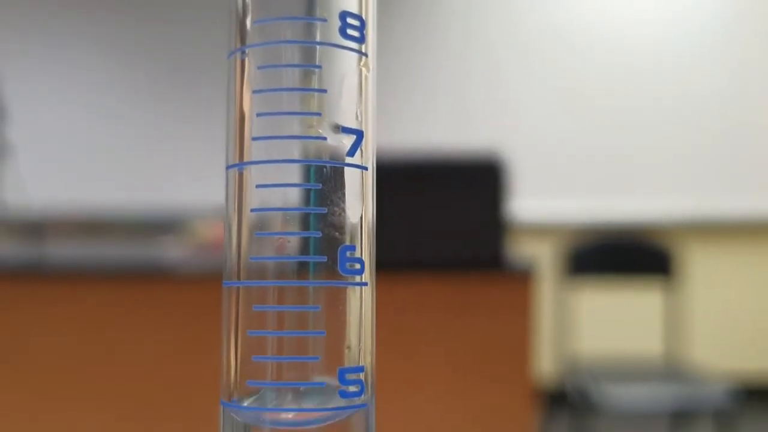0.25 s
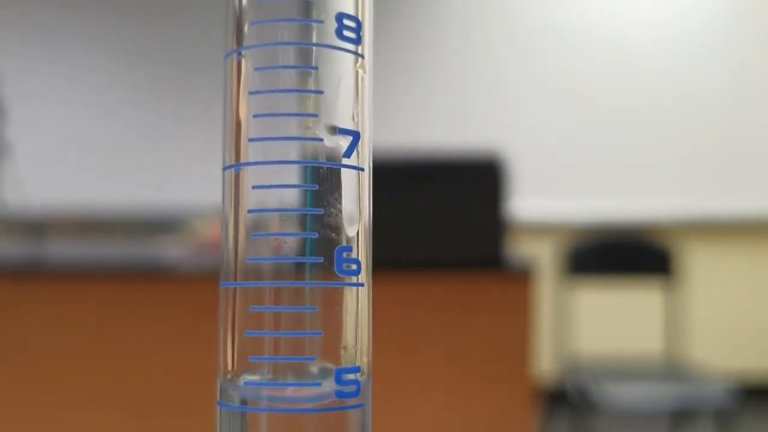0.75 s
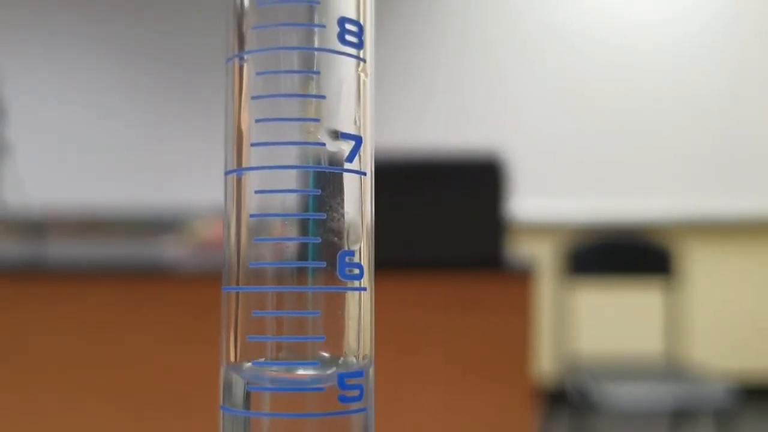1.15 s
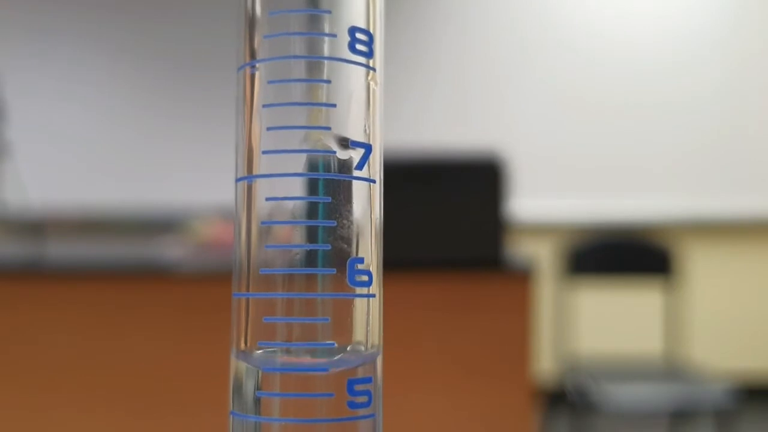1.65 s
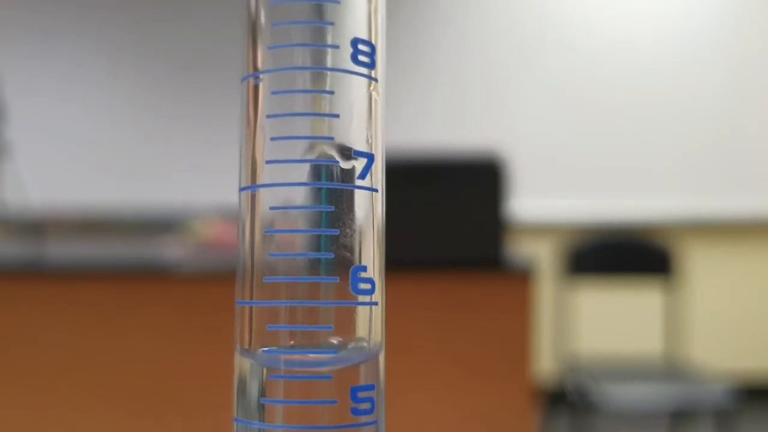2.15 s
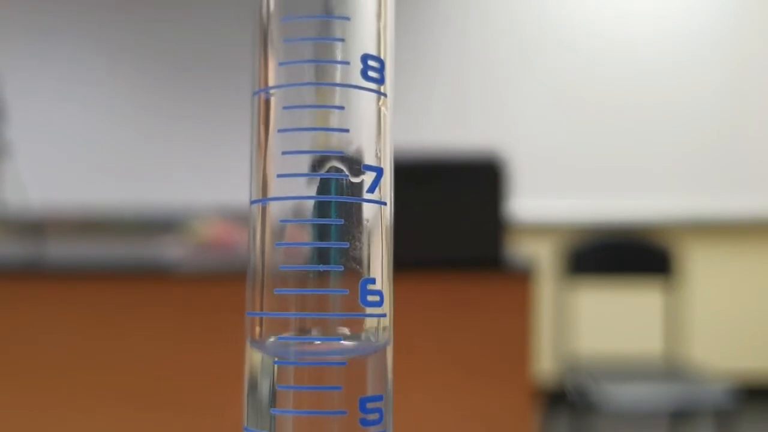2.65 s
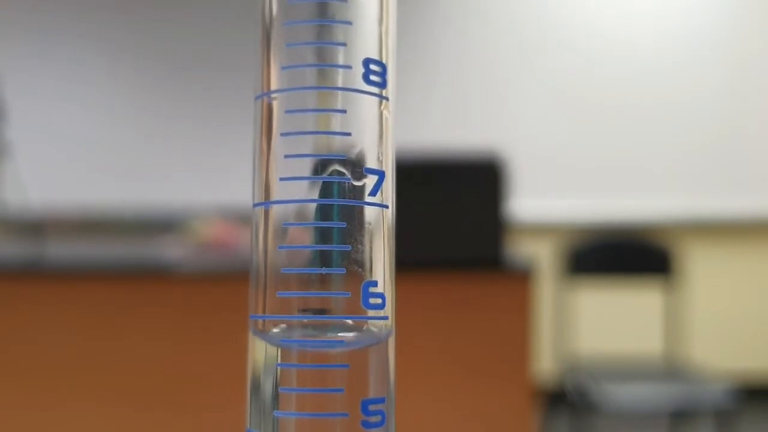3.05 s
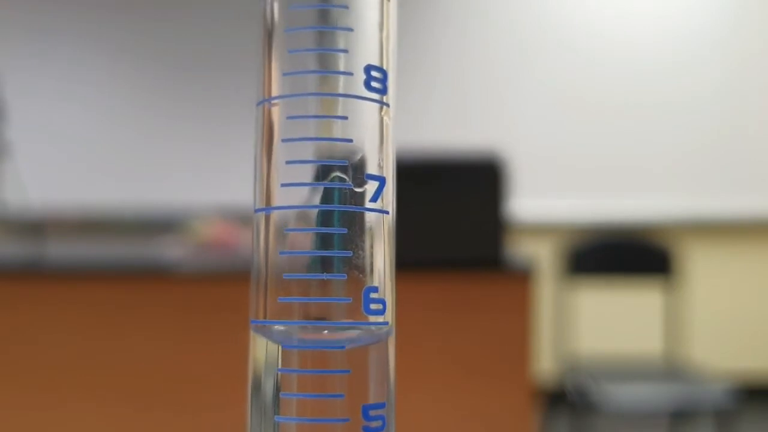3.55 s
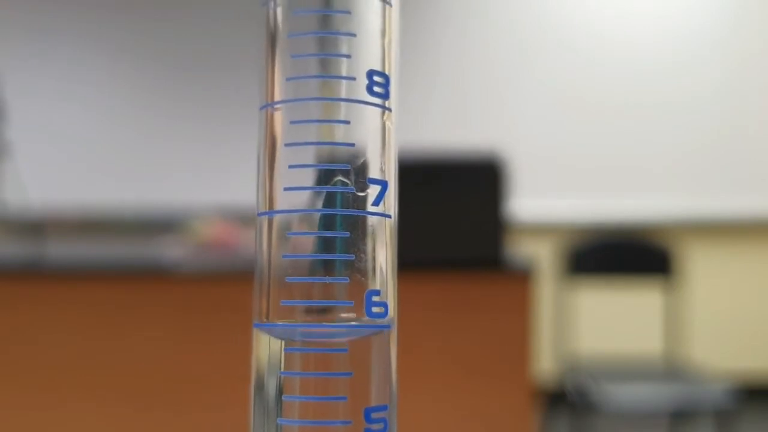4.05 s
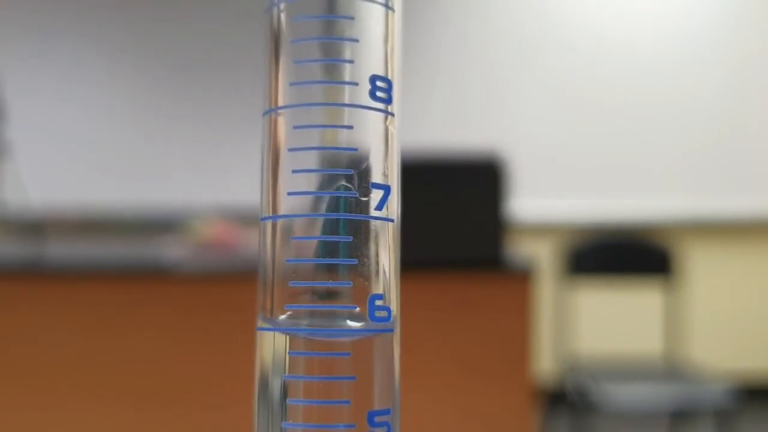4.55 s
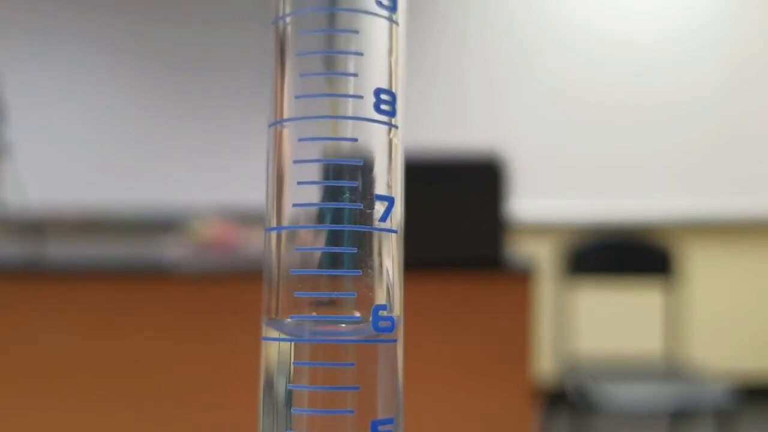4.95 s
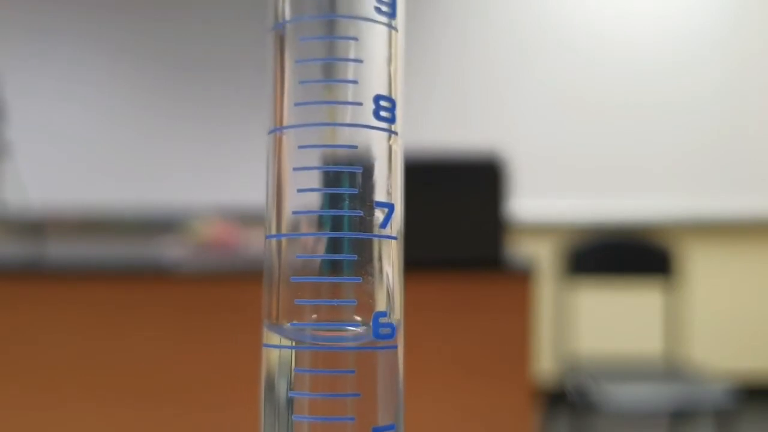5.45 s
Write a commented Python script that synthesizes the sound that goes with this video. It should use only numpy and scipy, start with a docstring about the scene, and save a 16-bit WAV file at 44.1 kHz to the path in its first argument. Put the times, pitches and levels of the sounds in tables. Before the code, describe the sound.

Deep fan drone pulses and beats unevenly in a still room, a faint distant wash swells and fades, then handling ticks cluster close up.

```python
"""Ventilation in a quiet classroom: a fan's drone throbs and beats in the duct, over rumbling air.
The air is shaped noise that also excites the low modes of the room; thin motor tones are wavering sines.
A distant wash, like a far car behind the windows, is noise that swells and fades; faint rustles across
the room are short hisses. The microphones are the two ports of a hand-held phone, which adds hiss and
sizzle; close to them, late in the take, its case ticks, thumps and rings as it slips in the grip."""
import sys
import numpy as np
from scipy import signal
from scipy.fft import rfft, irfft
from scipy.io import wavfile
from scipy.ndimage import uniform_filter1d

SR = 44100
rng = np.random.default_rng(int(sys.argv[2]) if len(sys.argv) > 2 else 0)


def put_to_file(sound):
    """Save the sound as 16-bit audio at rate SR, in the file named by the first command-line argument."""
    columns = np.atleast_2d(sound).T  # one column per channel
    safe = np.clip(columns, -1, 1)
    whole_steps = np.round(safe * 32767)
    wavfile.write(sys.argv[1], SR, whole_steps.astype(np.int16))


N = 251750
TIME = np.arange(N) / SR  # s
FREQ = np.maximum(np.arange(N // 2 + 1) * SR / N, 1)  # Hz, kept above zero for logs and ratios

# spectrum of the distant wash at full swell: pitch_hz, density_db (dB per Hz)
WASH_SPECTRUM = [(300, -100), (600, -86.5), (830, -86), (1020, -86), (1200, -99.5), (1550, -103),
                 (2000, -114), (3000, -128)]
# rise and fall of the wash: time_s, relative_level_db
WASH_SWELL = [(0, -15), (.6, -11), (1.2, -5), (1.8, -1.5), (2.6, 0), (3.1, -3.5), (3.8, -5.5), (4.5, -2.5),
              (5.2, -10), (5.7, -4.5)]

# faint rustles and ticks across the room: start_s, level_db (before the fade), centre_hz, width_hz
RUSTLE_EVENTS = [(.645, -84, 4800, 900), (3.3, -77.5, 2086, 280.4), (4.317, -81.5, 6500, 3800)]
RUSTLE_ATTACK_S, RUSTLE_T60_S, RUSTLE_PAN_DB = .008, 1, 4.5

# motor and mains tones: pitch_hz, level_db (rms), left_minus_right_db
MOTOR_TONES = [(289.1, -57.5, 4), (296.1, -58, 0), (502.3, -58.5, -4.5), (557, -74.5, 9.5),
               (605, -67.5, 15), (652, -77.5, 11.5), (837, -75.5, 3)]

# slips of the case in the grip: start_s, thump_db, ring_db, tick_hz, tick_db
CASE_SLIPS = [(5.084, -48, -70, 6000, -69), (5.103, -44, -82, 4500, -84), (5.281, -60, -77, 3200, -78),
              (5.443, -49, -70, 9400, -69), (5.465, -46, -67, 4300, -80), (5.525, -56, -82, 6000, -75),
              (5.602, -45, -71, 7800, -72), (5.634, -37, -43, 7900, -64), (5.656, -35, -66, 9500, -72),
              (5.669, -39, -73, 9000, -80), (5.686, -45, -56, 2600, -60)]
# resonances of the case, lowest first: pitch_hz, relative_level_db, t60_s, left_minus_right_db
CASE_RESONANCES = [(755, -3, .1, 6), (1150, -12, .02, 4), (1480, -15, .025, 4), (2490, -7, .05, 5),
                   (2720, -13, .025, 6), (3600, -19, .015, 8), (4240, -6, .055, 15), (4600, -22, .03, 12),
                   (5950, -23, .025, 10), (7820, -14, .035, 22), (8450, -25, .03, 10), (9500, -22, .025, 7)]
TICK_T60_S, TICK_WIDTH_HZ = .025, 600

# moving air: pitch_hz, density_db (dB per Hz)
AIR_SPECTRUM = [(15, -91.5), (30, -84.5), (46, -67.5), (100, -59.5), (150, -72.5), (230, -71.5),
                (380, -78.5), (520, -83.5), (700, -89.5), (1050, -99.5), (1400, -108), (2000, -115),
                (4200, -120), (6000, -134)]
# room and duct resonances that the air excites: pitch_hz, width_hz, density_db (dB per Hz)
ROOM_RESONANCES = [(47.3, 7.9, -63), (71.4, 23, -58.5), (90, 9.7, -54), (109.7, 17, -54.5),
                   (170.7, 22, -60.5), (195.4, 22, -66), (260.2, 16, -64.5), (294.2, 28, -63.5),
                   (334, 20, -69.5), (458, 34, -77.5)]

# strongest duct resonance, a close pair: pitch_hz, width_hz, relative_level_db
DUCT_RESONANCES = [(136, 20, -9), (138.3, 8.1, 0.5)]
# band that the duct passes: low_hz, high_hz
DUCT_BAND = (98, 148.5)
# uneven strength of the drone, with some quick dips and surges, before the throb: time_s, level_db
DRONE_STRENGTH = [(0.0, -34), (0.5, -33.5), (0.6, -39.5), (0.9, -31), (1.5, -35.5), (2.5, -30),
                  (2.7, -36.5), (3.3, -30.5), (3.4, -37.8), (3.8, -32), (4.0, -37), (4.1, -29), (4.3, -38),
                  (4.5, -32), (5.1, -33.5), (5.4, -40.0), (5.7, -28.5)]
FAN_HZ, FAN_DB = 137.2, -4.5  # level relative to the duct resonance
BEAT_S = .22  # slower swings are evened out; quicker beats are left to chance
THROB_PER_S, THROB_CREST_S, THROB_DB = 3.33, .129, 1.62  # rate, time of one crest, swing either way

# unequal openness of the two ports: pitch_hz, left_minus_right_db
PORT_OPENNESS = [(60, 0.0), (110, 0.5), (200, 0.5), (380, 1.5), (700, 2.5), (1290, 3.5), (2380, 2.0),
                 (4400, 1.0), (8120, 4.0), (15000, 1.0)]
PORT_SPACING_M = 0.17
# microphone sizzle on the left: pitch_hz, width_hz, density_db (dB per Hz)
MICROPHONE_SIZZLE = [(7080, 140, -118), (7650, 1100, -122)]
HISS_DB = -125.2  # dB per Hz
TOP_HZ = 15650


def undb(db):
    """Decibels to amplitude gain."""
    return 10 ** (np.asarray(db) / 20)


def curve(rows):
    """Rows (s, value) joined by straight lines."""
    return np.interp(TIME, *np.transpose(rows))


def contour(rows):
    """Rows (Hz, value) joined on a log-frequency axis."""
    hz, value = np.transpose(rows)
    return np.interp(np.log(FREQ), np.log(hz), value)


def resonances(modes):
    """Gain over frequency of steep resonances whose powers add."""
    power = 0
    for hz, width_hz, db in modes:
        gain = undb(db) / (1 + 2 * ((FREQ - hz) / width_hz) ** 2)
        power = power + gain ** 2
    return np.sqrt(power)


def noise(gain):
    """Noise with the given amplitude per root Hz."""
    spectrum = rfft(rng.standard_normal(N)) * gain
    return irfft(spectrum, N) * np.sqrt(SR / 2)


def walk(rate_hz):
    """Smooth random wandering with spread 1."""
    x = noise(np.exp(-np.minimum(FREQ / rate_hz, 20) ** 2))
    return x / np.std(x)


def fade(age_s, t60_s):
    """Exponential decay that falls 60 dB in t60_s."""
    return np.exp(-np.log(1000) * age_s / t60_s)


def pan(db):
    """Left and right gains for a left-minus-right level difference."""
    return undb(np.array([[1], [-1]]) * db / 2)


def diffuse(gain, spacing_m=PORT_SPACING_M):
    """Sound from all sides at two ports: alike in the bass, unrelated once waves are shorter than the spacing."""
    likeness = .985 * np.sinc(2 * FREQ * spacing_m / 343)  # 343 m/s, speed of sound
    mid = noise(gain * np.sqrt((1 + likeness) / 2))
    side = noise(gain * np.sqrt((1 - likeness) / 2))
    ports = np.array([mid + side, mid - side])
    return irfft(rfft(ports) * pan(contour(PORT_OPENNESS)), N)


def burst(low_hz, high_hz, t60_s, t):
    """A band of noise at each port that dies away over the times t."""
    band = signal.butter(2, [low_hz, high_hz], "band", fs=SR, output="sos")
    x = signal.sosfilt(band, rng.standard_normal((2, len(t))))
    return x / np.std(x) * fade(t, t60_s)


def wash():
    """A soft distant rush, like a far car behind the windows: diffuse noise that swells and fades."""
    return diffuse(undb(contour(WASH_SPECTRUM))) * undb(curve(WASH_SWELL))


def rustles():
    """Something small shifts across the room: a short hiss that dies away with the room's ring."""
    out = 0
    for start_s, level_db, centre_hz, width_hz in RUSTLE_EVENTS:
        age = np.maximum(TIME - start_s, 0)
        hiss = diffuse(resonances([(centre_hz, width_hz, 0)]))
        envelope = (1 - np.exp(-age / RUSTLE_ATTACK_S)) * fade(age, RUSTLE_T60_S)
        out = out + hiss / np.std(hiss) * undb(level_db) * envelope
    return out * pan(RUSTLE_PAN_DB)


def motors(waver_db=0.5, drift_rad=0.35):
    """Thin steady tones whose phase and level waver a little on their way through the room."""
    out = 0
    for hz, level_db, pan_db in MOTOR_TONES:
        phase = 2 * np.pi * (hz * TIME + rng.random()) + drift_rad * walk(3.1)
        tone = np.sqrt(2) * np.sin(phase)  # rms 1
        out = out + tone * undb(level_db + waver_db * walk(3.9)) * pan(pan_db)
    return out


def case_clicks(scatter_db=1, tail_db=-25, tail_t60_s=0.37, tick_pan_db=8):
    """Slips in the grip tick at the contact, thump the plastic case's lowest mode and ring its upper ones."""
    out = np.zeros((2, N))
    t = TIME[:SR // 3]
    push = 1 - np.exp(-(t / .0006) ** 2)  # soft onset of about a millisecond
    for start_s, thump_db, ring_db, tick_hz, tick_db in CASE_SLIPS:
        tick = burst(tick_hz - TICK_WIDTH_HZ / 2, tick_hz + TICK_WIDTH_HZ / 2, TICK_T60_S, t)
        click = tick * undb(tick_db) * pan(tick_pan_db)
        for k, (hz, mode_db, t60_s, pan_db) in enumerate(CASE_RESONANCES):
            strength_db = ring_db if k else thump_db
            gain = undb(strength_db + mode_db + scatter_db * rng.standard_normal())
            direct = np.sin(2 * np.pi * hz * t) * fade(t, t60_s)
            # the room answers with a faint blur around each mode
            tail = burst(hz * .92, hz * 1.08, tail_t60_s, t) * undb(tail_db)
            click = click + gain * pan(pan_db) * (direct + tail)
        start = int(start_s * SR)
        out[:, start:start + len(t)] += (push * click)[:, :N - start]
    return out


def ventilation(flutter_db=1.46):
    """Fluttering noise of moving air, and the room modes that it keeps ringing."""
    air = diffuse(undb(contour(AIR_SPECTRUM))) * undb(flutter_db * walk(7.4))
    return air + diffuse(resonances(ROOM_RESONANCES))


def drone():
    """The fan's tone beats against the air-driven duct resonance and throbs, nearly alike at both ports."""
    low_hz, high_hz = DUCT_BAND
    passband = 1 / (1 + (low_hz / FREQ) ** 16) / (1 + (FREQ / high_hz) ** 50)
    duct = diffuse(resonances(DUCT_RESONANCES) * passband, spacing_m=0)
    fan = np.sqrt(2) * np.sin(2 * np.pi * (FAN_HZ * TIME + rng.random()))
    beating = duct / np.std(duct) + undb(FAN_DB) * fan
    # even out the chance swings slower than the beats, so that the strength table sets the level
    power = np.mean(beating ** 2, axis=0)
    for _ in range(2):
        power = uniform_filter1d(power, size=int(BEAT_S * SR / 2))
    throb_db = THROB_DB * np.cos(2 * np.pi * THROB_PER_S * (TIME - THROB_CREST_S))
    return beating / np.sqrt(power) * undb(curve(DRONE_STRENGTH) + throb_db)


def scene():
    """The distant wash, faint rustles, motor tones, clicks in the hand and the ventilation together."""
    return wash() + rustles() + motors() + case_clicks() + ventilation() + drone()


def record(dry):
    """The phone adds separate hiss at each port and a shared sizzle, then cuts the top steeply."""
    hiss = np.array([noise(undb(HISS_DB)) for _ in range(2)])
    sizzle = noise(resonances(MICROPHONE_SIZZLE)) * undb(np.array([[0], [-14]]))  # weaker on the right
    top_cut = signal.ellip(10, .2, 70, TOP_HZ, fs=SR, output="sos")
    return signal.sosfilt(top_cut, dry + hiss + sizzle)


dry = scene()
out = record(dry)
put_to_file(out)
```